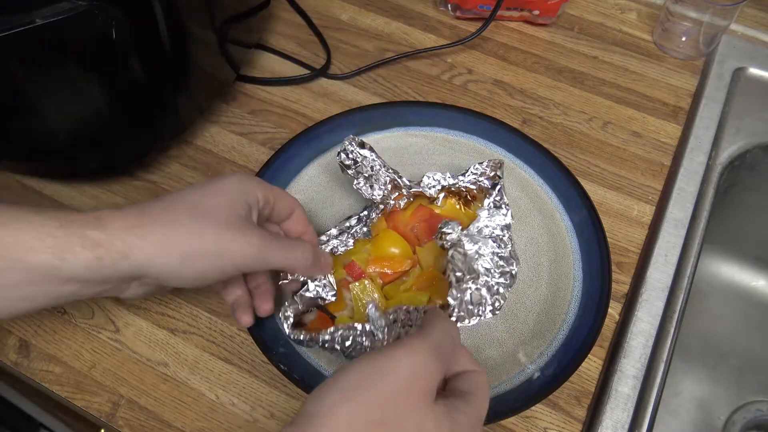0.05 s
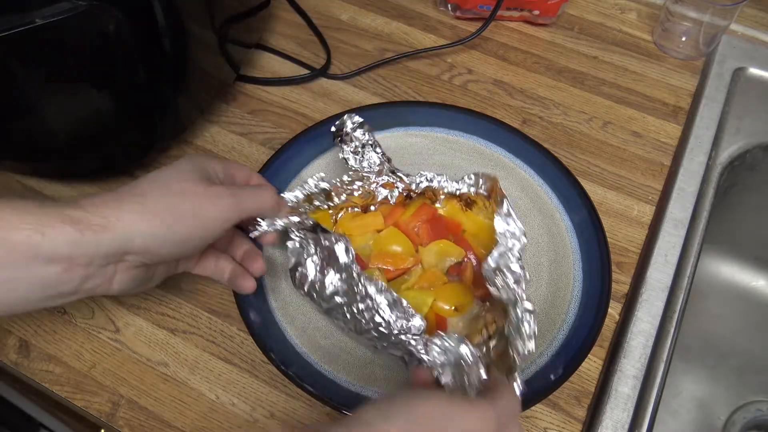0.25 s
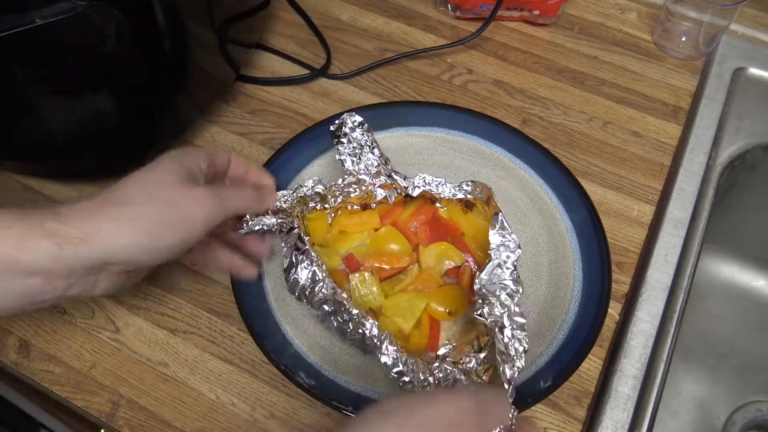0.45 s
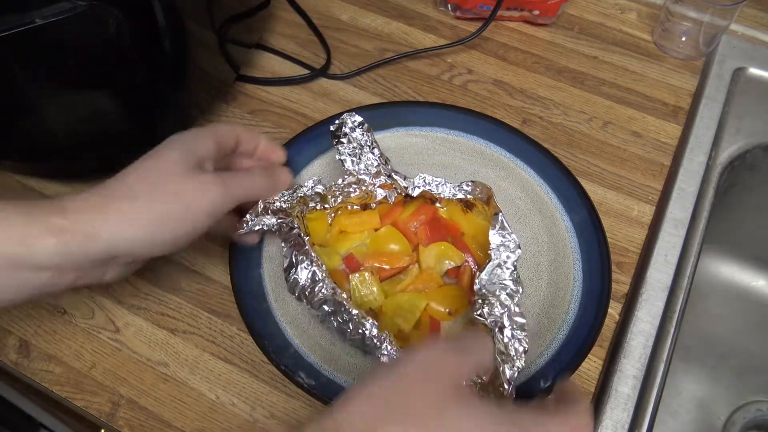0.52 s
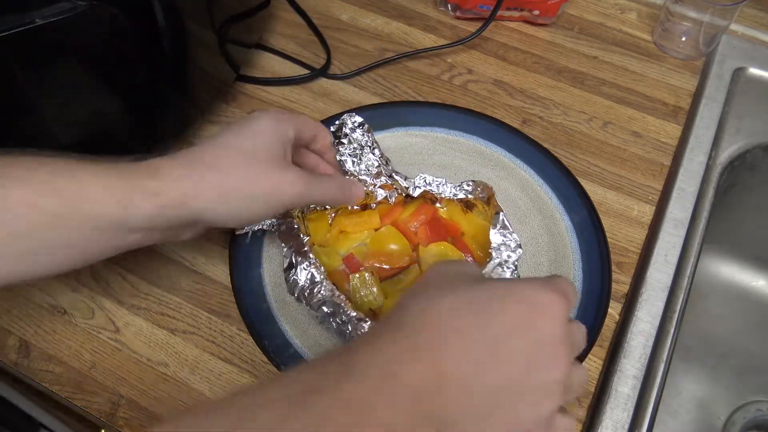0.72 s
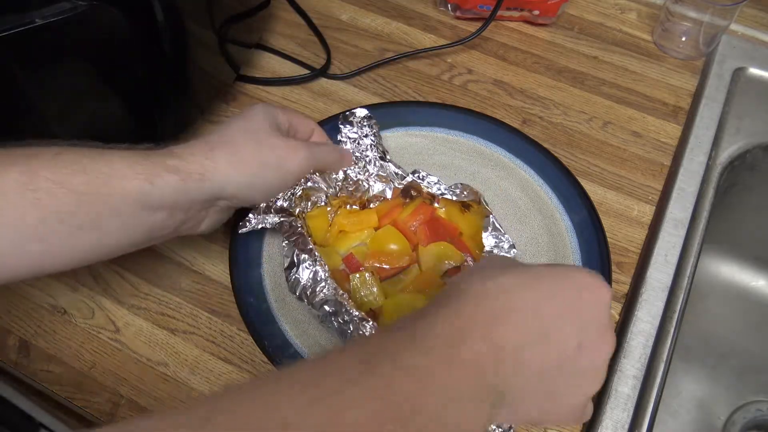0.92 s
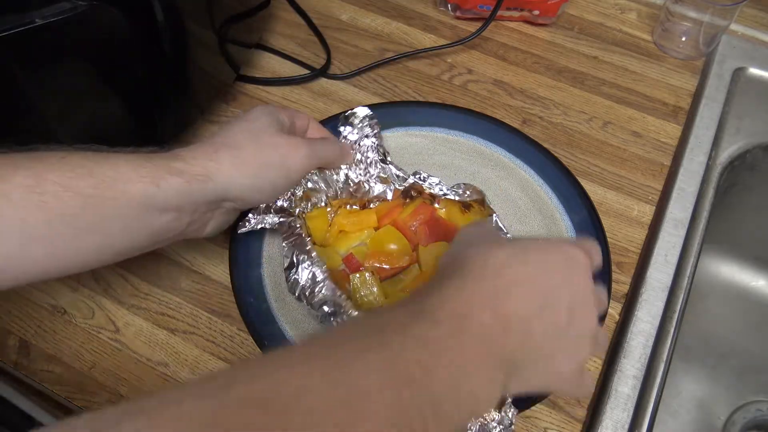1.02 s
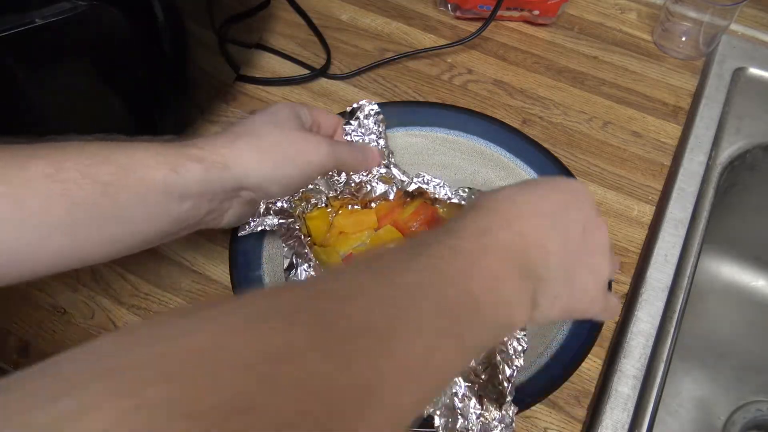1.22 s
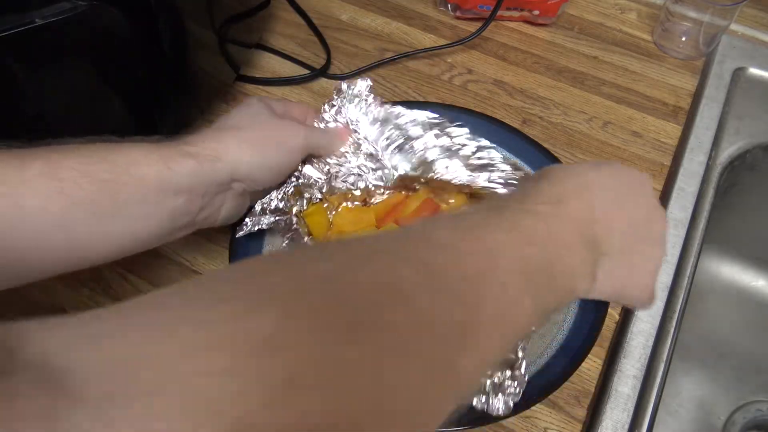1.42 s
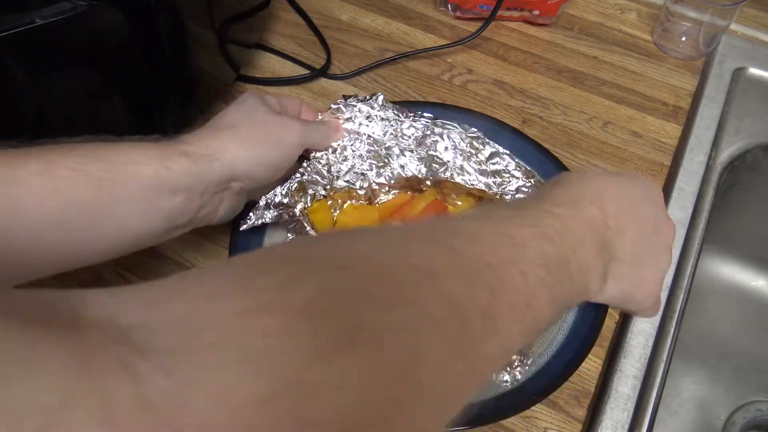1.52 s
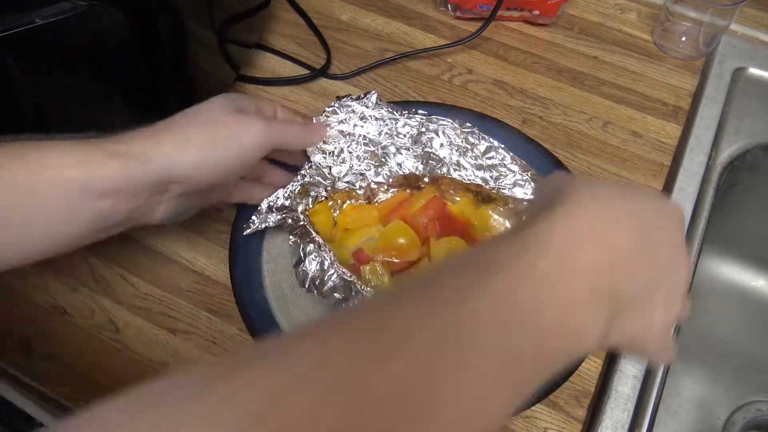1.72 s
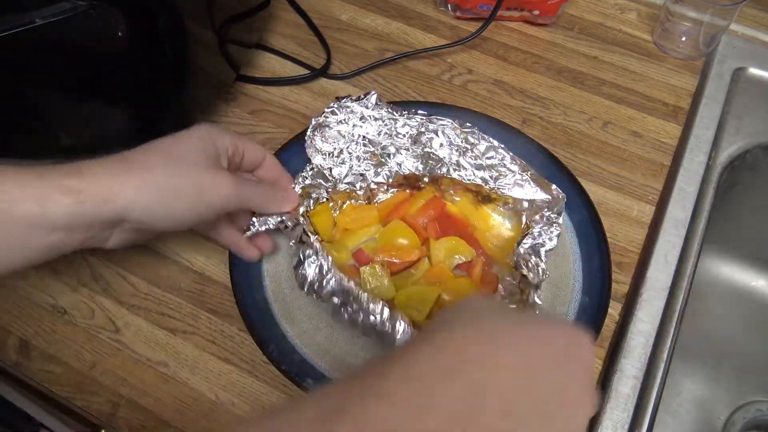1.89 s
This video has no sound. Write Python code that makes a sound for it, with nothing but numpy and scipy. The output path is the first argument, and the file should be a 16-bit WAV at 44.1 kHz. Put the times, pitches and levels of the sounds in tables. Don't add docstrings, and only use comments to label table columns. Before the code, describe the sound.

Aluminium foil packet crinkles and snaps open in sharp bright bursts over a kitchen plate

```python
import sys
import numpy as np
from scipy import signal
from scipy.fft import rfft, irfft, next_fast_len
from scipy.io import wavfile
from scipy.ndimage import uniform_filter1d

SR = 44100
rng = np.random.default_rng(int(sys.argv[2]) if len(sys.argv) > 2 else 0)


def wav_out(sig):
    wavfile.write(sys.argv[1], SR, np.round(np.clip(np.atleast_2d(sig).T, -1, 1) * 32767).astype(np.int16))


def boost(x):
    u = np.asarray(x, float) / 20
    return 10 ** u


N = 85995
BURST = 2048
BURST_T = np.arange(BURST) / SR

# (frequency [Hz], level [dB per Hz])
FOIL_COLOUR = [(1410, -50), (2400, 0), (3130, 1.5), (3450, 2), (7130, 5), (11000, 2), (15300, -3.5),
               (16100, -26), (16500, -43.5)]
# (frequency [Hz], level [dB per Hz])
FLAP_COLOUR = [(76, -75.5), (130, 2.5), (536, -6), (821, -5.5), (1020, -10.5), (1150, -10.5), (2070, -9.5),
               (2600, -16.5), (3380, -17), (5720, -120)]


def level(x, db):
    return x * boost(db) / np.sqrt(np.mean(x ** 2) + 1e-18)


def peak_one(x):
    return x / np.abs(x).max()


def colour(x, table):
    size = next_fast_len(len(x))
    hz = np.maximum(np.arange(size // 2 + 1) * SR / size, 1)
    table_hz, table_db = np.array(table).T
    gain = boost(np.interp(np.log(hz), np.log(table_hz), table_db))
    gain = gain / np.sqrt(np.mean(gain ** 2))
    return irfft(rfft(x, size) * gain, size)[:len(x)]


def ring(x, hz, width_hz):
    return signal.lfilter(*signal.iirpeak(min(hz, .45 * SR), hz / width_hz, fs=SR), x)


def ring_twice(x, hz, width_hz):
    return ring(ring(x, hz, width_hz), hz, width_hz)


def fade(count, t60):
    return np.exp(-np.log(1000) * np.arange(count) / SR / t60)


def walk(rate):
    k = int(SR / rate)
    steps = np.repeat(rng.standard_normal(N // k + 1), k)
    return uniform_filter1d(uniform_filter1d(steps, k), k)[:N]


def add_burst(out, start_s, burst):
    i = int(start_s * SR)
    out[i:i + BURST] += burst


def kitchen():
    # (frequency [Hz], level [dB per Hz])
    kitchen_colour = [(41, -55), (70, 4), (108, 4.5), (412, 5), (664, -6), (2840, -23), (6590, -31),
                      (12200, -30), (16000, -46.5)]
    noise = rng.standard_normal((4, N))
    hum = ring_twice(noise[0], 55.04, 4.15)
    floor = colour(noise[1], kitchen_colour) * boost(0.16 * walk(7.3))
    rumble = ring_twice(noise[2], 30, 23)
    sway = ring(noise[3], 9, 5.5) * boost(3 * walk(5))
    return level(floor, -53) + level(hum, -51.5) + level(rumble, -60) + level(sway, -53.5)


def crackle(table, sizes_hz, rate, scatter_db, t60):
    rows = []
    for hz in sizes_hz:
        clicks = (rng.random(N) < rate / SR) * boost(scatter_db * rng.exponential(size=N))
        env = signal.lfilter([1], [1, -np.exp(-np.log(1000) / t60 / SR)], clicks)
        grain = ring(env * rng.standard_normal(N), hz, 0.2 * hz)
        grain = grain * boost(3 * walk(30))
        grain = level(grain, 10 * np.log10(hz))
        rows.append(colour(grain, table))
    return np.array(rows) / np.std(np.sum(rows, axis=0))


def tilt(sizes_hz, db_per_octave):
    octaves = np.log2(np.array(sizes_hz) / np.median(sizes_hz))
    return boost(db_per_octave * octaves)[:, None]


def drags():
    # (start [s], end [s])
    pull_times = [(.045, .105), (.124, .168), (.175, .219), (.301, .356), (.358, .456), (.457, .483),
                  (.676, .774), (.775, .808), (.808, .895), (.895, .92), (.92, 1.049), (1.05, 1.07),
                  (1.07, 1.09), (1.188, 1.242), (1.243, 1.28), (1.28, 1.358), (1.362, 1.42), (1.423, 1.486),
                  (1.487, 1.518), (1.518, 1.565), (1.613, 1.65), (1.65, 1.667), (1.668, 1.687),
                  (1.875, 1.893), (1.927, 1.95)]
    # (level at start [dB], level at end [dB], flaps against facets [dB])
    pull_levels = [(-56, -52, 0), (-51.5, -53, -5), (-66, -60.5, -1), (-41.5, -46, -5.5),
                   (-47.5, -50.5, -0.5), (-42.5, -38, -5.5), (-53, -51.5, -2.5), (-59, -52, 3.5),
                   (-50, -48, 3.5), (-45.5, -51, 8), (-49.5, -50, -1), (-36.5, -39, -12.5),
                   (-43.5, -34, -1.5), (-50, -48, 1.5), (-42.5, -50, -3.5), (-57.5, -52.5, -8.5),
                   (-60.5, -49, -1), (-43, -43, -2.5), (-40, -37, -7), (-43, -52, -0.5),
                   (-49.5, -51.5, -2.5), (-45.5, -37.5, -4), (-33.5, -41, -4), (-54.5, -60, 4.5),
                   (-44, -54, 0.5)]
    # (facets [dB per octave], flaps [dB per octave])
    pull_tilts = [(-.3, -3.5), (-.3, -1), (-.3, 2), (.3, -1.5), (-.3, -1.7), (-.3, -1.5), (-.3, 1),
                  (-.3, .3), (-.3, -1.5), (-.3, -1), (.3, 2.8), (.3, 4), (.3, 2.5), (.3, 2.2), (-.3, 2),
                  (-.3, 5.5), (-.3, -7), (-.3, -0.7), (-.3, 7), (-.3, 3.5), (-.3, -2.5), (-.3, -3),
                  (.3, -1.5), (-.3, 0.5), (-.3, -2.9)]
    facets_hz = [3000, 3700, 4500, 5500, 6600, 7900, 9400, 11000, 12800, 14800]
    flaps_hz = [320, 500, 750, 1200, 1700, 2200]
    release_s = 0.0016
    t, high, low = np.arange(N) / SR, 0, 0
    for (start, end), (db, end_db, low_db), (high_tilt, low_tilt) in zip(pull_times, pull_levels, pull_tilts):
        env = (t >= start) * boost(np.interp(t, [start, end], [db, end_db]))
        env = env * np.exp(-np.maximum(t - end, 0) / release_s)
        high = high + env * tilt(facets_hz, high_tilt)
        low = low + env * boost(low_db) * tilt(flaps_hz, low_tilt)
    crackling = high * crackle(FOIL_COLOUR, facets_hz, rate=1900, scatter_db=2, t60=0.0053)
    rustling = low * crackle(FLAP_COLOUR, flaps_hz, rate=700, scatter_db=3.5, t60=0.029)
    return np.sum(crackling, axis=0) + np.sum(rustling, axis=0)


def snap_tone(push, hz):
    def band(f):
        return peak_one(ring_twice(push, f, 0.3 * f))

    above, below = 1.498 * np.exp(0.079 * rng.standard_normal(2))
    tone = band(hz)
    tone = tone + boost(-5.5) * band(min(hz * above, 15000))
    tone = tone + boost(-14) * band(min(hz / below, 15000))
    return peak_one(peak_one(tone) + boost(-6) * peak_one(colour(push, FOIL_COLOUR)))


def snap_flap(thud, hz):
    swing = np.sin(2 * np.pi * hz * BURST_T) * np.exp(-np.pi * 0.12 * hz * BURST_T)
    thud = thud * BURST_T * np.exp(-BURST_T / 0.0026)
    return swing + boost(-2.5) * peak_one(colour(ring(thud, 1260, 1900), FLAP_COLOUR))


def snaps():
    # (time [s], peak level [dB], ring [Hz], flap against peak [dB], flap
    # pitch [Hz])
    single_snaps = [(0.0455, -41, 3900, -7.5, 490), (0.1266, -45, 6110, -13, 520),
                    (0.221, 0, 7200, -19, 890), (0.3011, -21, 10800, -41, 778),
                    (0.3072, -19.5, 11400, -45, 680), (0.312, -23, 11300, -18.5, 1200),
                    (0.3302, -18, 11050, -10.5, 904), (0.3412, -21.5, 7100, -31, 835),
                    (0.3485, -27.5, 6900, -6, 1640), (0.418, -25, 5170, -13, 870),
                    (0.4593, -32.5, 6800, -7, 690), (0.4706, -21, 4910, -3.5, 1157),
                    (0.4744, -19, 6460, -4, 1075), (0.585, -81.5, 3310, 0, 455),
                    (0.6786, -45, 6500, -5.5, 513), (0.7102, -30, 11500, -38, 494),
                    (0.8129, -39.5, 9600, 5.5, 690), (0.8773, -40.5, 3700, 9, 730),
                    (0.8944, -31, 8950, 4, 602), (0.9085, -23, 8400, -10, 2070),
                    (1.0043, -27, 12400, -10.5, 1930), (1.0172, -19.5, 7230, -36, 517),
                    (1.043, -33, 7950, -15, 401), (1.0511, -22.5, 8300, -19, 1980),
                    (1.084, -17.5, 9500, -11.5, 735), (1.1916, -24, 7550, -13.5, 1480),
                    (1.2098, -22.5, 10700, -15.5, 413), (1.2439, -22, 6650, -7.5, 810),
                    (1.3218, -29.5, 8200, -25, 407), (1.3378, -31.5, 8450, -10.5, 430),
                    (1.3617, -17.5, 8600, -19, 650), (1.379, -25.5, 5850, -6.5, 1970),
                    (1.3969, -27, 8340, -19, 660), (1.4081, -24.5, 8100, -4, 1750),
                    (1.421, -15.5, 5260, -25, 1790), (1.4372, -20.5, 7400, -5, 760),
                  (1.455, -23.5, 5640, -31, 805), (1.4685, -25, 7600, -22, 424),
                  (1.488, -29.5, 7040, -0.5, 850), (1.5016, -21, 7700, -7, 1890),
                  (1.5055, -25, 4700, -1, 1390), (1.5112, -16, 4970, -11, 1320),
                  (1.6138, -29, 6700, -20, 430), (1.6623, -29.5, 5350, -9.5, 830),
                  (1.6674, -15, 7200, -11, 834), (1.6809, -26, 3120, -11, 1180),
                  (1.791, -54, 3900, -4, 438), (1.813, -47, 3800, -49, 460), (1.8214, -49, 2540, -12, 405),
                  (1.8486, -48.5, 3880, -8, 503), (1.8743, -32.5, 5300, -12.5, 493),
                  (1.929, -34.5, 7920, -11, 560)]
    rise_s, push_s = 0.00021, 0.00087
    click, after = np.zeros(N + BURST), np.zeros(N + BURST)
    for start, db, hz, low_db, low_hz in single_snaps:
        push, thud, shiver = rng.standard_normal((3, BURST))
        push = push * (1 - np.exp(-BURST_T / rise_s)) * np.exp(-BURST_T / push_s)
        shiver = shiver * (1 - np.exp(-BURST_T / push_s)) * fade(BURST, 0.032)
        shiver = boost(-14) * colour(shiver, FOIL_COLOUR)
        flap = boost(low_db + 0.5) * snap_flap(thud, low_hz)
        gain = boost(db - 2.5)
        add_burst(click, start, gain * snap_tone(push, hz))
        add_burst(after, start, gain * (shiver + flap))
    return click[:N], after[:N]


def tears():
    # (time [s], peak level [dB], ring [Hz], rise [s], fall [s])
    slow_tears = [(0.0722, -42, 6500, .001, 0.0035), (0.0745, -38.5, 3960, 0.0013, 0.0045),
                  (0.4571, -38, 6800, 0.0015, 0.0026), (0.7094, -34, 11500, .0015, 0.0025),
                  (0.7964, -40, 8120, .0005, 0.0022), (0.855, -39, 6500, .002, 0.0046),
                  (0.8944, -41, 9100, .0005, 0.0016), (0.99, -36, 9000, .004, 0.0038),
                  (1.056, -27.5, 8240, 0.0027, .004), (1.0813, -20.5, 9500, 0.0016, 0.0021),
                  (1.2083, -25, 10400, 0.0016, 0.0043), (1.305, -41, 6660, .001, .002),
                  (1.4863, -24, 6870, 0.00078, 0.0024), (1.674, -31, 8500, 0.0012, 0.0025),
                  (1.678, -28.5, 8250, 0.0015, 0.0015), (1.876, -32.5, 6370, 0.00088, 0.0023)]
    out = np.zeros(N + BURST)
    for start, db, hz, rise, fall in slow_tears:
        push = rng.standard_normal(BURST) * (1 - np.exp(-BURST_T / rise)) ** 2 * np.exp(-BURST_T / fall)
        tone = peak_one(ring(push, hz, 0.12 * hz)) + boost(4) * peak_one(colour(push, FOIL_COLOUR))
        add_burst(out, start, boost(db) * peak_one(tone))
    return out[:N]


def buzzes():
    # (time [s], peak level [dB], ring [Hz], fall [s])
    loose_facets = [(0.2215, -26.5, 1230, 0.0045), (0.2225, -16, 10360, 0.0012),
                    (0.2235, -26, 4230, 0.0024), (0.417, -31, 6970, 0.0012), (0.70, -42, 7800, 0.017),
                    (0.74, -47, 6250, 0.014), (0.822, -41, 9700, 0.013), (0.852, -40, 6470, .01),
                    (0.975, -39.5, 8900, .012), (1.082, -36.5, 690, 0.0033), (1.25, -34, 8100, 0.0099),
                    (1.8122, -48, 8050, .001), (1.4875, -39, 11260, 0.0025), (1.5115, -27, 13000, .002),
                    (1.6138, -37, 3400, 0.0026), (1.662, -32.5, 3290, 0.0094), (1.667, -35, 454, .003),
                    (1.876, -42, 1930, 0.0031)]
    out = np.zeros(N + BURST)
    for start, db, hz, fall in loose_facets:
        push = rng.standard_normal(BURST) * (1 - np.exp(-BURST_T / 0.00089)) * np.exp(-BURST_T / fall)
        add_burst(out, start, boost(db) * peak_one(ring_twice(push, hz, 0.17 * hz + 150)))
    return out[:N]


def knocks():
    # (time [s], peak level [dB], ring [Hz])
    plate_knocks = [
        (0.797, -34, 755),
        (0.9003, -28, 640),
        (0.895, -32, 254),
        (1.088, -40, 700),
        (1.223, -30.5, 860),
        (1.396, -31, 1400),
        (1.418, -25, 1890),
    ]
    out = np.zeros(N + BURST)
    for start, db, hz in plate_knocks:
        tone = np.sin(2 * np.pi * hz * BURST_T) * np.exp(-np.pi * 0.23 * hz * BURST_T)
        add_burst(out, start, boost(db) * tone)
    return out[:N]


def room(x):
    def energy_one(v):
        return v / np.sqrt(np.sum(v ** 2))

    n = SR // 2
    noise, early = rng.standard_normal((2, n))
    low = signal.sosfilt(signal.butter(2, 3000, fs=SR, output="sos"), noise)
    mid = signal.sosfilt(signal.butter(2, 10000, fs=SR, output="sos"), noise) - low
    high = noise - low - mid
    tail = low * fade(n, 0.24) + mid * fade(n, 0.26) + high * fade(n, 0.18)
    tail = tail * (1 - fade(n, 0.0073))
    echo = boost(-7.5) * energy_one(tail) + boost(-15) * energy_one(early * fade(n, 0.09))
    return x + signal.fftconvolve(x, echo)[:N]


def scene():
    click, after = snaps()
    foil = after + drags() + tears() + buzzes() + knocks()
    return (click + room(foil) + kitchen())[None]


def top_cut(x):
    return signal.sosfilt(signal.butter(12, 17010, fs=SR, output="sos"), x)


def record(dry):
    cut = signal.sosfilt(signal.ellip(10, .2, 42, 15900, fs=SR, output="sos"), dry)
    return top_cut(cut)


dry = scene()
out = record(dry)
wav_out(out)
```